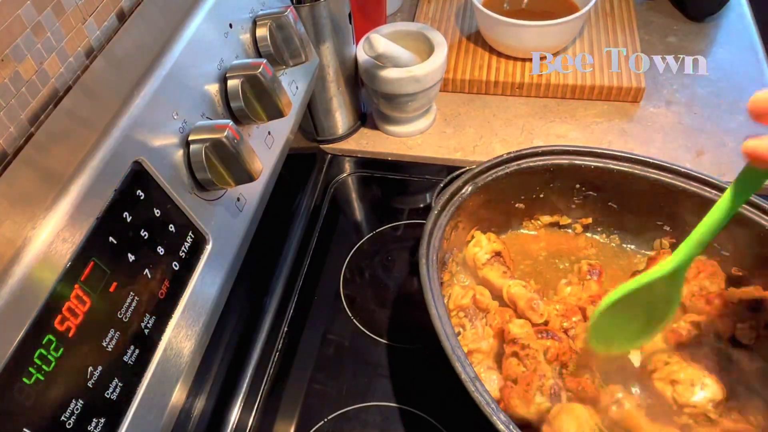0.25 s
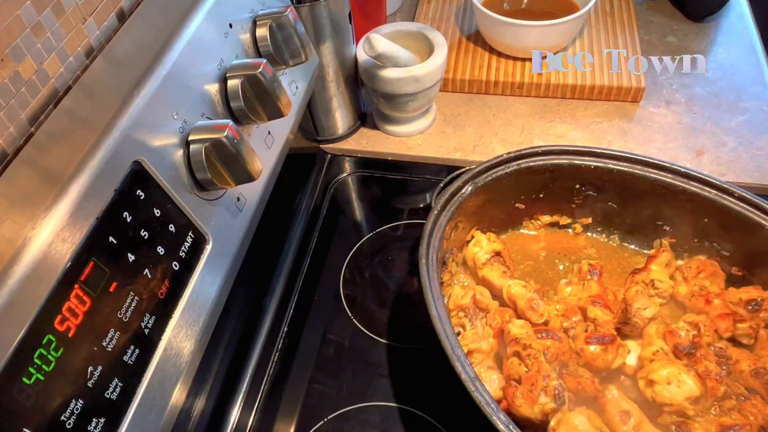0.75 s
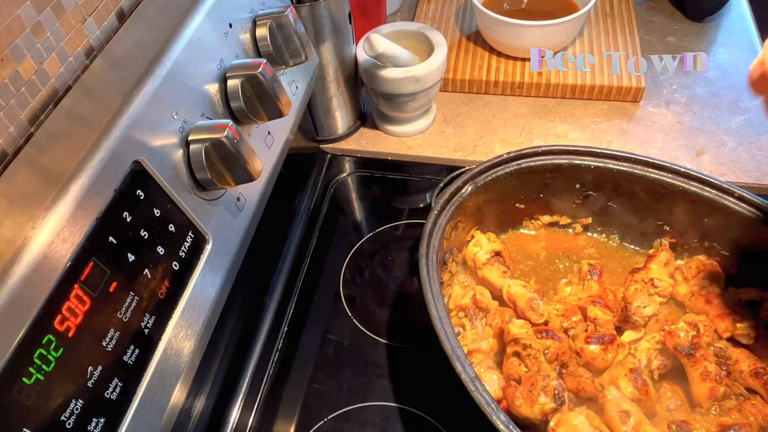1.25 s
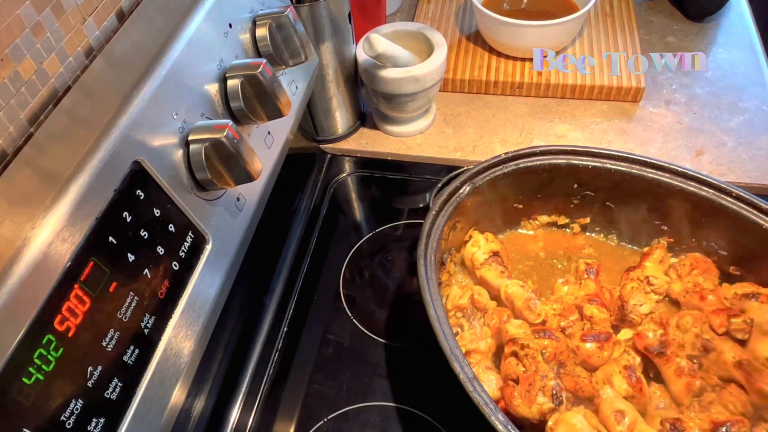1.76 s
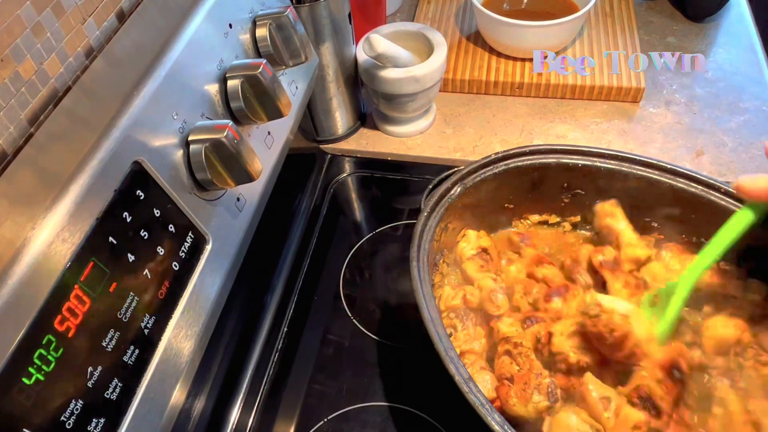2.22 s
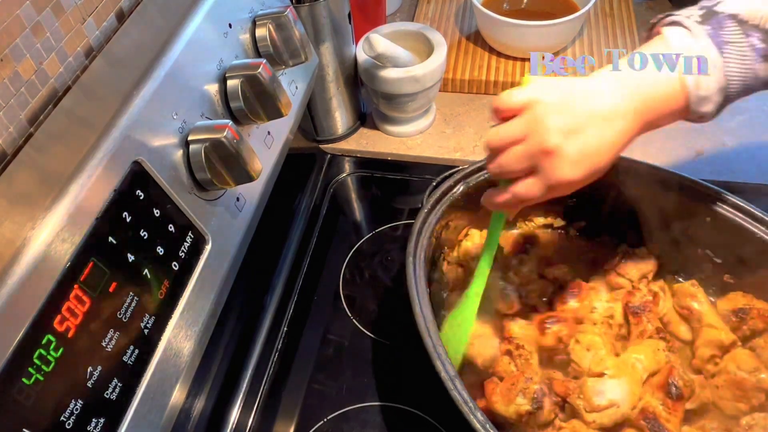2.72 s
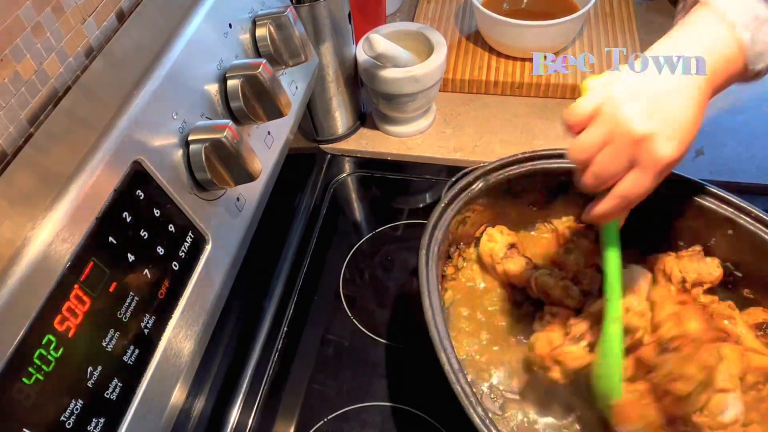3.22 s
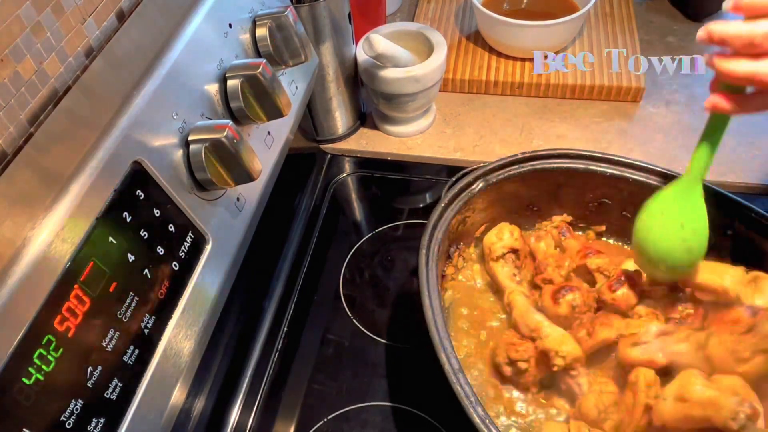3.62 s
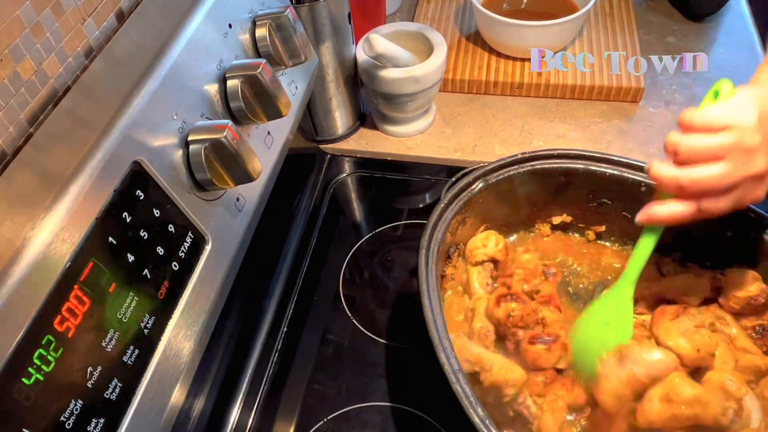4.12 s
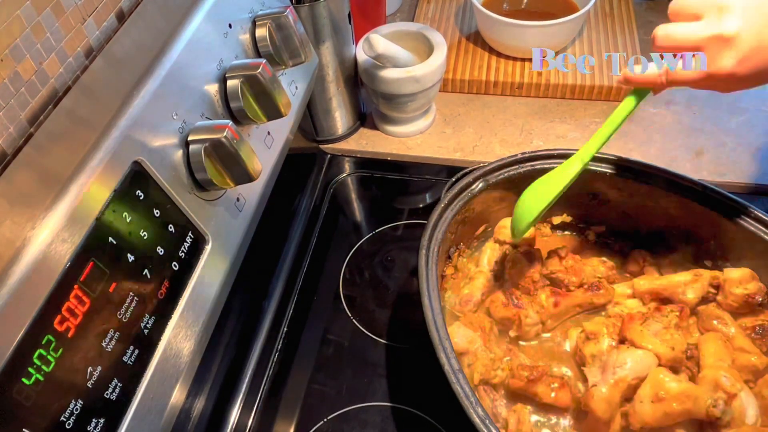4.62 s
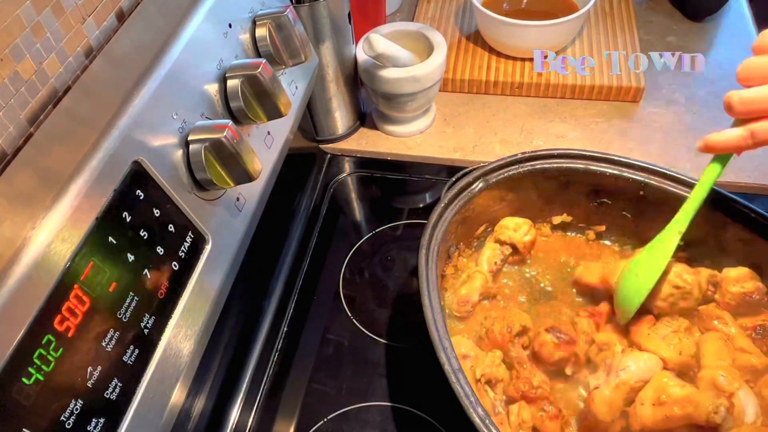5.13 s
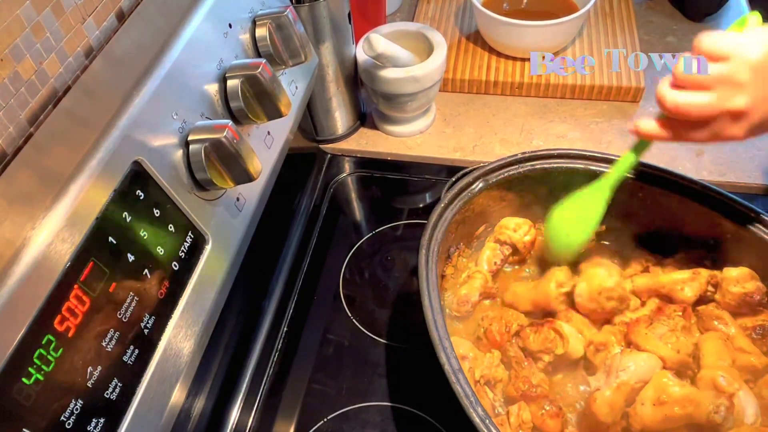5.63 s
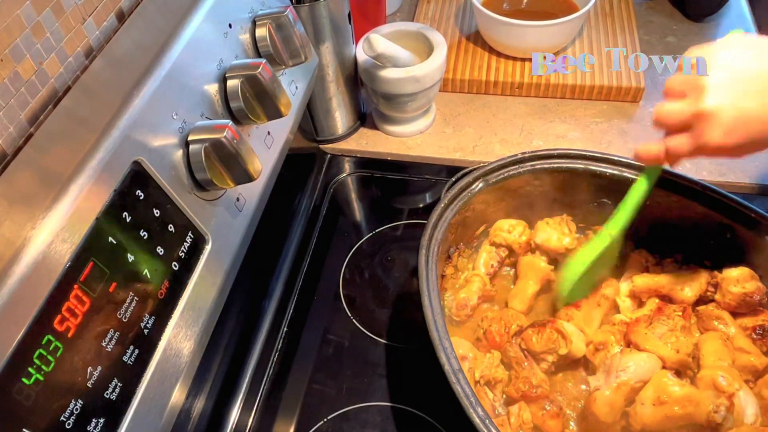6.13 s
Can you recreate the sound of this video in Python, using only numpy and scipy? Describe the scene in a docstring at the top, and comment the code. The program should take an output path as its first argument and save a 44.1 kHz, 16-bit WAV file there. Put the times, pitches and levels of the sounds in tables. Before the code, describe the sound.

Saucy chicken sizzles and spits in a metal pan while a soft spoon stirs, giving hollow knocks, low stove thuds and wet squelches.

```python
"""A low appliance rumble and a faint hiss open the scene; then sauce sizzles, spits and squelches on a hot stove.
A soft spoon stirs chicken pieces in a steel roasting pan in a small kitchen: knocks ring the pan as decaying
modes and thud through the stove top as bending waves, lows arriving last. Sizzle and stirring are clouds of
random clicks, spits are dying noise bursts, slurps are gliding noise bands and the rumble is coloured noise.
Two edits leave short, nearly silent gaps."""
import sys
import numpy as np
from scipy import signal
from scipy.fft import rfft, irfft
from scipy.io import wavfile

SR = 44100
rng = np.random.default_rng(int(sys.argv[2]) if len(sys.argv) > 2 else 0)


def voltage_ratio(decibels):
    """Convert decibels (scalar or array-like) to amplitude ratios, 20 dB per decade."""
    exponent = np.asarray(decibels, float) / 20
    return 10 ** exponent


def file_out(sig):
    """Save sig as 16-bit WAV at sys.argv[1]."""
    # one column per channel
    cols = np.atleast_2d(sig).T
    # limit, then scale
    lim = np.clip(cols, -1, 1)
    pcm = np.round(lim * 32767).astype(np.int16)
    wavfile.write(sys.argv[1], SR, pcm)


N = 280476   # length in samples

# Low thuds through the stove top. Each row: start in seconds, peak in dB, settled pitch in Hz,
# swell in seconds, t60 in seconds.
STOVE_THUDS = [(0.096, -56, 109, 0.014, 0.11), (0.728, -20.5, 117.6, 0.011, 0.086),
               (0.802, -43, 138, 0.014, 0.057), (1.247, -21, 130, 0.012, 0.086),
               (1.302, -40, 137, 0.0017, 0.2), (1.385, -44.5, 131.3, 0.012, 0.099),
               (1.641, -26, 138, 0.018, 0.02), (1.663, -25.5, 71, 0.012, 0.037),
               (1.689, -40, 146, 0.012, 0.069), (1.759, -51, 187, 0.025, 0.062),
               (1.869, -34.5, 139, 0.0045, 0.064), (1.918, -40.5, 76, 0.0098, 0.044),
               (2.273, -44.5, 152.6, 0.017, 0.12), (2.653, -32, 142.7, 0.016, 0.14),
               (2.666, -32.5, 92.7, 0.015, 0.16), (2.682, -32, 163, 0.011, 0.046),
               (2.718, -40, 83.5, 0.0088, 0.045), (2.799, -36.5, 115, 0.015, 0.12),
               (2.92, -53, 115, 0.022, 0.034), (3.806, -20.5, 143, 0.028, 0.059),
               (3.953, -33, 81.5, 0.0039, 0.11), (4.095, -36, 87, 0.01, 0.095),
               (4.198, -43.5, 104, 0.0025, 0.13), (4.429, -41.5, 69.5, 0.011, 0.048),
               (4.89, -27, 151.6, 0.0088, 0.058), (4.914, -28.5, 61.5, 0.015, 0.075),
               (5.453, -48, 149, 0.023, 0.051), (5.525, -39, 153, 0.01, 0.14),
               (5.56, -38, 83.7, 0.012, 0.087), (5.599, -47, 142.4, 0.0099, 0.18),
               (5.888, -53, 59, 0.0068, 0.064), (6.225, -43.5, 143.4, 0.004, 0.15),
               (6.24, -42.5, 90, 0.0126, 0.16)]
# Course of the sauce. Each row: time in seconds, level of the lower sizzle in dB, level of the upper
# treble in dB, level of the stirring in dB.
SAUCE_COURSE = [(0.0, -74, -73, -76.5), (0.09, -78, -74.5, -78), (0.1, -67, -59, -93),
                (0.27, -63.5, -61, -84), (0.42, -61.5, -61, -86), (1.0, -68, -67.5, -86.5),
                (1.27, -69.5, -67, -70.5), (1.42, -65, -62.5, -65), (1.61, -65.5, -67, -68.5),
                (1.83, -62.5, -63, -64), (2.29, -70, -69.5, -73), (2.33, -76, -70, -78),
                (2.635, -76, -75.5, -82), (2.65, -62.5, -69, -65), (2.824, -71, -68.5, -70),
                (3.15, -77.5, -70.5, -77.5), (3.55, -81, -79.5, -82.5), (3.804, -81.5, -75.5, -81),
                (3.974, -72.5, -70.5, -76), (4.11, -77.5, -75, -78), (4.13, -66, -62.5, -72.5),
                (4.312, -67, -67.5, -76), (4.58, -75, -71, -83), (4.95, -75.5, -73, -81.5),
                (4.97, -75, -73, -81), (5.206, -79, -76, -82), (5.612, -75, -73.5, -86),
                (6.36, -80, -78, -80.5)]
# Spectrum of the sizzle. Each row: frequency in Hz, relative density in dB per Hz.
SIZZLE_SPECTRUM = [(590, -8.5), (1000, -5.5), (1150, -6.5), (1840, -9), (2020, -8.5), (2560, -4),
                   (3760, -2), (4460, 0.5), (6940, -4.5), (8230, -10), (9010, -9), (10800, -3),
                   (12700, -4.5), (15000, -9)]
USUAL_BLOW_DB = -35   # blow level at which the levels of sway, shake and scuff are stated


def in_time(rows):
    """Linear interpolation turns each column of a curve table into one value a sample."""
    s, *columns = np.transpose(rows)
    return [np.interp(np.arange(N) / SR, s, column) for column in columns]


def rms_one(x):
    """Normalisation by the root mean square gives unit mean power."""
    return x / np.sqrt(np.mean(x ** 2) + 1e-20)


def colour(x, spectrum):
    """Spectral shaping: a filter in the frequency domain gives white noise a tabled spectrum; rms 1."""
    hz, db = np.transpose(spectrum)
    bins_hz = np.maximum(np.arange(N // 2 + 1) * SR / N, 1)
    gain = voltage_ratio(np.interp(np.log(bins_hz), np.log(hz), db))
    return rms_one(irfft(rfft(x) * gain, N))


def drift(per_s):
    """Slow random modulation: straight lines join per_s random knots a second, of spread 1."""
    knots = rng.standard_normal(300)
    return np.interp(np.arange(N) / SR * per_s, np.arange(300), knots)


def resonate(x, hz, width_hz):
    """A two-pole resonator, its pole radius set by the bandwidth; gain 1 on top."""
    r = np.exp(-np.pi * width_hz / SR)
    return signal.lfilter([(1 - r * r) / 2, 0, (r * r - 1) / 2],
                          [1, -2 * r * np.cos(2 * np.pi * hz / SR), r * r], x)


def add(out, s, piece):
    """Superposition: mix a piece in at time s."""
    at = round(s * SR)
    out[at:at + len(piece)] += piece[:N - at]


def grains(per_s, size_db):
    """Random impulses of uneven size and sign, their rate modulated so that they clump; rms 1."""
    born = rng.random(N) < per_s * voltage_ratio(3.0 * drift(25)) / SR
    size = voltage_ratio(size_db * np.minimum(rng.exponential(1, N), 5))
    return rms_one(born * size * rng.choice([-1, 1], N))


def rumble():
    """Appliances and burner as coloured noise; stirring and thuds add power, as incoherent sources do."""
    # Spectrum of the steady rumble. Each row: frequency in Hz, relative density in dB per Hz.
    room_spectrum = [(15, -23), (25, 2.5), (65, -0.5), (189, -4.5), (236, -18.5), (288, -12.5), (352, -21),
                     (902, -20.5), (1060, -32.5), (1170, -20), (1400, -35), (1850, -50.5), (2050, -82),
                     (3000, -30), (3900, -49), (6600, -120)]
    # Motor murmur. Each row: frequency in Hz, width of each of two equal resonances in Hz, relative level in dB.
    hum_bands = [(59.1, 3.2, -2), (123.65, 1.37, -11), (188.4, 5.9, -15.5)]
    rumble_db, db_per_stir_db, usual_stir_db = -66, 0.38, -80
    shake_db, db_per_thud_db, shake_t60_s = -67.5, 0.72, 1.12

    white = rng.standard_normal(N)
    hum = 0
    for hz, width, db in hum_bands:
        hum = hum + voltage_ratio(db) * rms_one(resonate(resonate(white, hz, width), hz, width))

    s, thud_db = np.transpose(STOVE_THUDS)[:2]
    jolts = np.zeros(N)
    jolts[(s * SR).astype(int)] = voltage_ratio(shake_db + db_per_thud_db * (thud_db - USUAL_BLOW_DB)) ** 2
    shaken_power = signal.lfilter([1], [1, -voltage_ratio(-60 / (shake_t60_s * SR)) ** 2], jolts)

    stir_db = in_time(SAUCE_COURSE)[2]
    steady = voltage_ratio(rumble_db + db_per_stir_db * (stir_db - usual_stir_db) + 0.5 * drift(6.7))
    return np.sqrt(steady ** 2 + shaken_power) * (colour(rng.standard_normal(N), room_spectrum) + hum)


def sauce():
    """Dense tiny pops fizz; stirring excites resonances of the pan floor by friction and bursts wet pockets."""
    # Treble resonances of the pan floor. Each row: frequency in Hz, width in Hz, relative level in dB.
    floor_modes = [(1240, 26, -22.5), (1490, 170, -7.5), (1800, 21, -7.5), (1945, 5.1, -16),
                   (2580, 180, -10), (3170, 140, -11), (4370, 31, -11), (6800, 86, -11.5)]
    split_hz, flicker_db, sing_db, patchy_db = 8300, 2.0, -16, 4
    rub_share = 0.41   # power of rubbing against squelch, 0-1
    sizzle_db, upper_db, stir_db = in_time(SAUCE_COURSE)

    fizz = colour(grains(9000, 4.1) + 0.56 * rng.standard_normal(N), SIZZLE_SPECTRUM)
    lower = signal.sosfiltfilt(signal.butter(6, split_hz, fs=SR, output="sos"), fizz)
    sing = sum(voltage_ratio(db) * rms_one(resonate(lower, hz, width)) for hz, width, db in floor_modes)
    sizzle = voltage_ratio(sizzle_db + flicker_db * drift(18)) * (rms_one(lower) + voltage_ratio(sing_db) * sing)
    sizzle += voltage_ratio(upper_db + flicker_db * drift(7.4)) * rms_one(fizz - lower)

    slips = grains(1600, 3.3)
    scrape = 0
    for hz, width, db in floor_modes:
        scrape = scrape + voltage_ratio(db + patchy_db * drift(10)) * rms_one(resonate(slips, hz, width))

    # each burst is dealt to one of 14 pocket pitches
    bursts, pitches_hz, dealt = grains(2500, 6.4), np.geomspace(800, 3200, 14), rng.integers(0, 14, N)
    wet = sum(resonate(bursts * (dealt == k) + 1e-18, hz, hz / 2.2) for k, hz in enumerate(pitches_hz))
    stirring = np.sqrt(rub_share) * rms_one(scrape) + np.sqrt(1 - rub_share) * rms_one(wet)
    return sizzle + voltage_ratio(stir_db) * stirring


def slurps():
    """The spoon's edge squeaks: low-pass noise modulates a gliding carrier, giving a moving narrow band."""
    # Each row: start in seconds, length in seconds, first pitch in Hz, last pitch in Hz, level in dB.
    glides = [(0.791, 0.041, 3050, 3055, -58.5), (0.796, .04, 1467, 1455, -57.5),
              (0.83, 0.055, 900, 950, -69), (1.32, 0.11, 1780, 1845, -65), (1.404, 0.034, 2160, 2440, -63),
              (1.66, 0.08, 3220, 3160, -61.5), (1.805, 0.016, 1720, 1850, -57.5),
              (1.88, 0.176, 3070, 3170, -72), (2.693, 0.071, 2700, 3050, -67),
              (2.694, 0.073, 1480, 1510, -66.5)]
    half_width_hz = 140
    out = np.zeros(N)
    lowpass = signal.butter(2, half_width_hz, fs=SR, output="sos")
    wobble = signal.sosfilt(lowpass, rng.standard_normal((2, N)))
    wobble = wobble / wobble.std()
    for s, length, from_hz, to_hz, db in glides:
        t, at = np.arange(round(length * SR)) / SR, round(s * SR)
        phase = 2 * np.pi * (from_hz * t + (to_hz - from_hz) * t * t / (2 * length))
        in_phase, quadrature = wobble[:, at:at + len(t)]
        tone = in_phase * np.cos(phase) + quadrature * np.sin(phase)
        swell = np.sqrt(np.sin(np.pi * t / length))
        add(out, s, voltage_ratio(db) * swell * tone)
    return out


def spits():
    """Exponentially dying noise, part broad crack and part the resonance of the bursting pocket."""
    # The clearest spits and smacks. Each row: start in seconds, nominal peak in dB, pitch in Hz,
    # t60 in seconds, share of broad crack from 0 to 1.
    clear_spits = [(0.094, -48, 11900, 0.14, 0.8), (0.188, -44, 12700, 0.075, 1),
                   (0.3036, -46.5, 4370, 0.041, 0.1), (0.623, -45.5, 4270, 0.039, 0.7),
                   (0.721, -32.5, 1370, 0.051, 0.06), (0.805, -42, 3050, 0.097, 0.77),
                   (0.9304, -43, 11600, 0.02, 0.3), (1.2397, -44.5, 1280, 0.25, 0.2),
                   (1.4486, -40.5, 2580, 0.032, 0.74), (1.489, -37, 11700, 0.017, 0.77),
                   (1.523, -42.5, 3160, 0.015, 0.15), (1.607, -34.5, 11700, 0.069, 0.78),
                   (1.8293, -46.5, 1470, 0.15, 0), (1.8643, -38, 4000, 0.054, 0.34),
                   (1.9372, -35, 1400, 0.026, 0.95), (2.2818, -41, 11000, 0.056, 0.6),
                   (2.3253, -49, 12700, 0.07, 0.54), (2.409, -47.5, 10400, 0.022, 0.3),
                   (2.64, -51, 4370, 0.074, 0.7), (2.85, -50, 1260, 0.04, 1), (2.921, -53, 3140, 0.13, 0),
                   (2.9546, -37, 4320, 0.042, 0.6), (2.956, -42.5, 1800, 0.047, 0),
                   (3.086, -50, 1240, 0.14, 0.88), (3.167, -45, 1270, 0.098, 0.76),
                   (3.2502, -47.5, 9900, 0.03, 0.5), (3.2969, -52.5, 1670, 0.046, 0.5),
                   (3.3107, -49.5, 11700, 0.033, 0.26), (3.526, -54.5, 1840, 0.057, 0.5),
                   (3.6794, -38.5, 13100, 0.016, 0), (3.737, -47.5, 3170, 0.05, 0.8),
                   (3.822, -54, 1190, 0.11, 0.54), (3.906, -51, 3730, 0.03, 0.8),
                   (4.595, -43, 2860, 0.019, 0.75), (4.8888, -41.5, 1200, 0.067, 0.02),
                   (4.9722, -51.5, 11600, 0.21, 0.6), (5.4512, -45.5, 1160, 0.092, 0.7),
                   (5.5303, -45.5, 7100, 0.023, 0.46), (5.7485, -49, 9150, 0.024, 0.15),
                   (6.0903, -53, 4840, 0.021, 0.86), (6.224, -49, 3220, 0.11, 0.57)]
    # The faint ones. Mean peak over the upper treble in dB, t60 in seconds, share of broad crack from 0 to 1.
    faint_spit = (8.8, 0.027, 0.52)
    q, count, spread_db = 14.0, 50, 5.0
    out, t = np.zeros(N), np.arange(SR // 8) / SR
    crack = colour(rng.standard_normal(N), SIZZLE_SPECTRUM)
    white = rng.standard_normal(N)

    faint_db, faint_t60, faint_broad = faint_spit
    upper_db = in_time(SAUCE_COURSE)[1]
    chance_spits = []
    for when, size, pitch in rng.random((count, 3)):
        db = upper_db[int(when * N)] + faint_db + spread_db * (2 * size - 1)
        chance_spits.append((when * N / SR, db, 1500 * 9 ** pitch, faint_t60, faint_broad))

    for s, db, hz, t60, broad in [*clear_spits, *chance_spits]:
        at = min(round(s * SR), N - len(t))
        pocket = rms_one(resonate(white[at:at + len(t)], hz, hz / q))
        # the noise has rms 1, taken as 7.5 dB below its peak
        shape = voltage_ratio(db - 7.5 - 60 * t / t60) * np.minimum(t / 0.001, 1)
        noise = np.sqrt(broad) * crack[at:at + len(t)] + np.sqrt(1 - broad) * pocket
        add(out, s, shape * noise)
    return out


def knocks():
    """Modal synthesis: each blow rings the pan's modes, damped by food, lower ones building up later."""
    # Spoon and bone on the pan. Each row: start in seconds, peak of the ringing in dB, pitch favoured by
    # the spot struck in Hz, share of the free ring time, tock against the ringing peak in dB.
    blows = [(0.7225, -27, 608, 0.66, -3), (0.743, -33, 324, 0.62, -10), (0.805, -50.5, 319, 0.25, 6.5),
             (1.239, -24, 686, 1, -8.5), (1.64, -28.5, 626, 0.36, -19), (1.664, -41, 563, 0.88, -13),
             (1.711, -47, 467, 0.15, -10), (1.872, -42.5, 297, 0.087, 1.5), (1.886, -41.5, 278, 0.16, 3.5),
             (2.648, -43, 523, 1, -6), (2.652, -43, 289, 0.28, 9), (3.171, -50.5, 305, 0.42, -11),
             (3.804, -40.5, 248, 0.53, 3.5), (3.827, -44.5, 253, 0.56, -8), (3.938, -48.5, 416, 0.2, -26),
             (4.199, -50, 610, 0.33, -2), (4.889, -36.5, 687, 0.086, -3), (4.894, -40, 420, 0.21, 0.5),
             (5.456, -37.5, 400, 0.16, 5), (5.588, -43.5, 424, 0.22, 1), (6.218, -44, 557, 0.15, -15)]
    # Modes of the pan. Each row: frequency in Hz, relative level in dB, free t60 in seconds.
    pan_modes = [(225, -20, 0.026), (287, -2, 0.1), (322, 7, 0.24), (373, -11, 0.12), (560, 5, 0.19),
                 (586, -5, 0.14), (657, -7, 0.11), (770, 4, 0.19), (799, -4, 0.13), (888, -14, 0.1),
                 (1200, -20, 0.07)]
    lag_cycles, below_db, above_db = 1.02, 5.5, 11.5   # build-up; loss per octave away from the spot's pitch
    tock_cycles = 26.6   # cycles in which the tock falls by 60 dB
    scuff_db, db_per_knock_db, scuff_t60_s = -51.5, 0.8, 0.06
    soft_hz = 1900
    out, t = np.zeros(N), np.arange(SR // 3) / SR
    hz, mode_db, t60 = np.transpose(pan_modes)[:, :, None]
    chance_db = rng.normal(0, 2.5, (len(blows), len(pan_modes), 1))
    band = signal.butter(4, [220, 1600], "band", fs=SR, output="sos")
    grit = rms_one(signal.sosfilt(band, rng.standard_normal(N)))

    for (s, db, spot_hz, free, tock_db), luck_db in zip(blows, chance_db):
        spot_loss_db = np.where(hz > spot_hz, above_db, below_db) * np.abs(np.log2(hz / spot_hz))
        strength = voltage_ratio(mode_db - spot_loss_db + luck_db - 60 * t / (t60 * free))
        build_up = 1 - np.exp(-(t * hz / lag_cycles) ** 2)
        ring = np.sum(strength * build_up * np.sin(2 * np.pi * hz * t), axis=0)

        cycles = spot_hz * t   # the struck spot has a short dull pitch of its own
        tock = voltage_ratio(tock_db - 60 * cycles / tock_cycles) * (1 - np.exp(-(cycles / 1.3) ** 2))
        tock = tock * np.sin(2 * np.pi * cycles)

        rub = np.roll(grit, -round(s * SR))[:len(t)]
        rub_db = scuff_db + db_per_knock_db * (db - USUAL_BLOW_DB)
        scuff = rub * voltage_ratio(rub_db - 60 * t / scuff_t60_s) * np.minimum(t / 0.0024, 1)
        add(out, s, voltage_ratio(db) * (ring / np.abs(ring).max() + tock) + scuff)
    return signal.sosfilt(signal.butter(3, soft_hz, fs=SR, output="sos"), out)   # a soft edge makes little treble


def thuds():
    """Dispersion of bending waves: fast highs come first, so the pitch falls; a deeper frame sway follows."""
    glide_s, bend = 0.0051, 1.284   # the pitch falls from double with this time constant; curve of the decay
    sway_db, db_per_thud_db = -41.5, 0.73
    sway_ratio, sway_lag = 0.65, 1.23   # pitch and slowness of the sway against the thud
    out, t = np.zeros(N), np.arange(SR // 3) / SR
    for s, db, hz, swell, t60 in STOVE_THUDS:
        cycles = hz * (t + glide_s * (1 - np.exp(-t / glide_s)))
        deep_db = sway_db + db_per_thud_db * (db - USUAL_BLOW_DB)
        for level_db, ratio, slow in (db, 1, 1), (deep_db, sway_ratio, sway_lag):
            rise = np.sin(np.pi / 2 * np.minimum(t / (swell * slow), 1)) ** 2
            fade_db = -60 * (np.maximum(t / slow - swell, 0) / t60) ** bend   # holds, then is choked
            add(out, s, voltage_ratio(level_db + fade_db) * rise * np.sin(2 * np.pi * ratio * cycles))
    return out


def kitchen(x):
    """Reverberation by convolution: the room answers with a dull tail of exponentially dying noise."""
    t60_s, wet_db, bass_hz, wall_hz = 0.25, -21, 250, 3500
    t = np.arange(SR // 2) / SR
    tail = rng.standard_normal(len(t)) * voltage_ratio(-60 * t / t60_s) * (t > 0.008)
    tail = signal.sosfilt(signal.butter(1, [bass_hz, wall_hz], "band", fs=SR, output="sos"), tail)
    return x + voltage_ratio(wet_db) * signal.fftconvolve(x, tail / np.linalg.norm(tail))[:N]


def scene():
    """Superposition: blows, spits and slurps sound in the room, over the steady layers."""
    in_room = kitchen(thuds() + knocks() + spits() + slurps())
    return (in_room + sauce() + rumble())[None]


def roll_off(x):
    """The treble ends steeply here."""
    return signal.sosfilt(signal.butter(12, 15660, fs=SR, output="sos"), x)


def record(dry):
    """Linear filtering: the microphone loses deep bass, has a treble notch and a steep top; edits mute briefly."""
    # Muted edits. Each row: start in seconds, end in seconds, fade before the start in seconds.
    gaps = [(2.3003, 2.324, 0.00016), (4.946, 4.962, .004)]
    gap_db, top_hz, low_hz = -55, 15400, 42
    notch_hz, notch_width_hz, notch_share = 8250, 600, 0.78
    heard = signal.sosfilt(signal.cheby2(14, 50, top_hz, fs=SR, output="sos"), dry)
    heard = signal.sosfilt(signal.butter(2, low_hz, "high", fs=SR, output="sos"), heard)
    for hz in notch_hz - 200, notch_hz + 200:
        heard = heard - notch_share * resonate(heard, hz, notch_width_hz)

    t, muted = np.arange(N) / SR, np.zeros(N)
    for start, end, fade in gaps:
        muted += np.interp(t, [start - fade, start, end, end + 20 / SR], [0, 1, 1, 0])
    mix = heard * (1 - muted * (1 - voltage_ratio(gap_db)))
    return roll_off(mix)


dry = scene()
out = record(dry)
file_out(out)
```